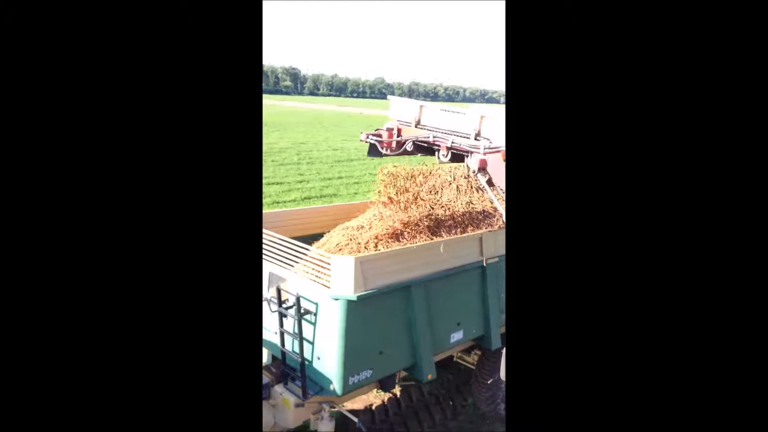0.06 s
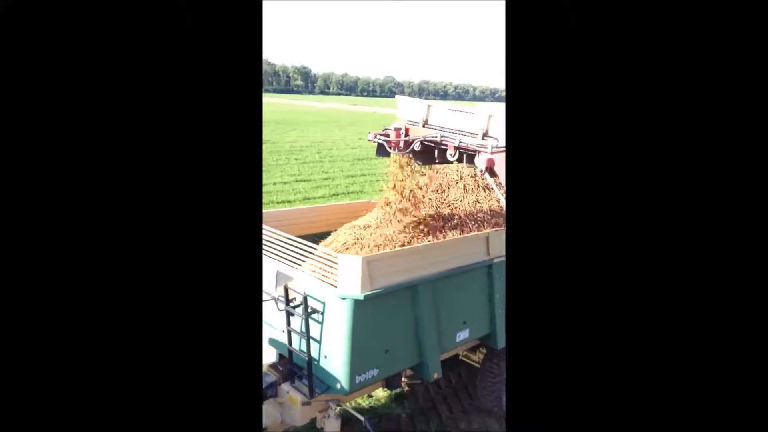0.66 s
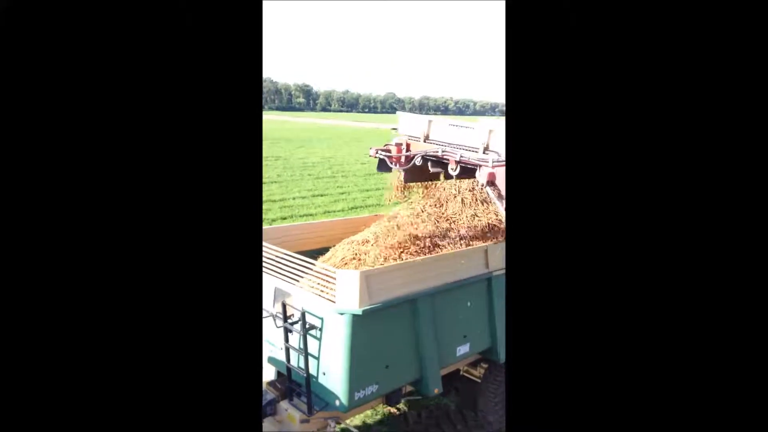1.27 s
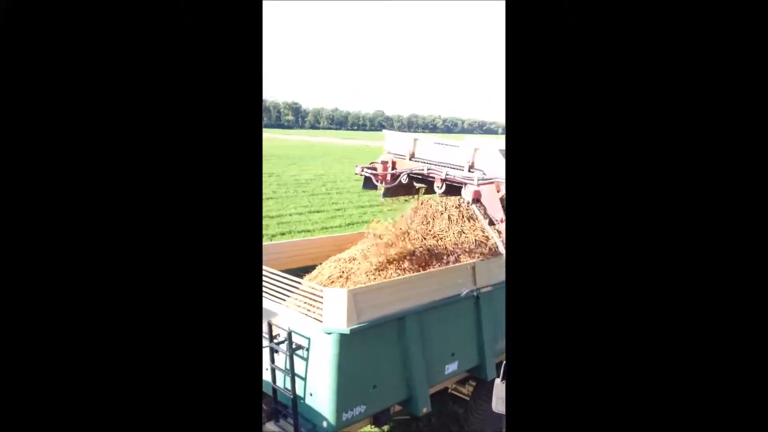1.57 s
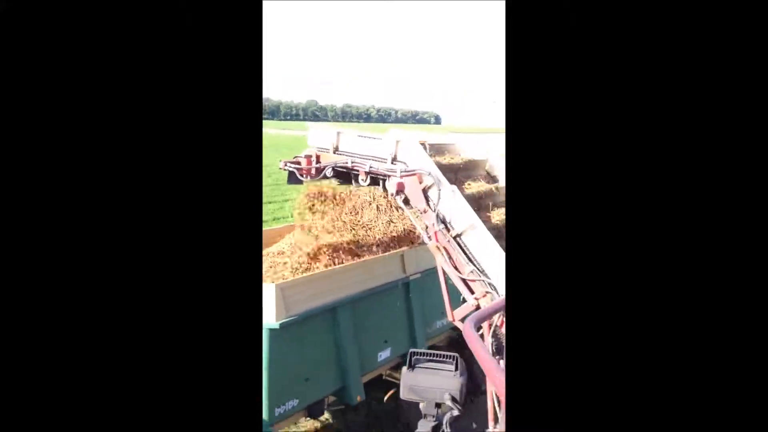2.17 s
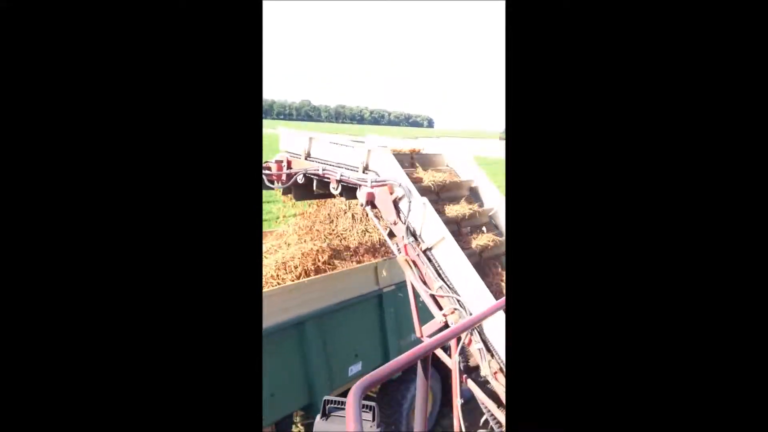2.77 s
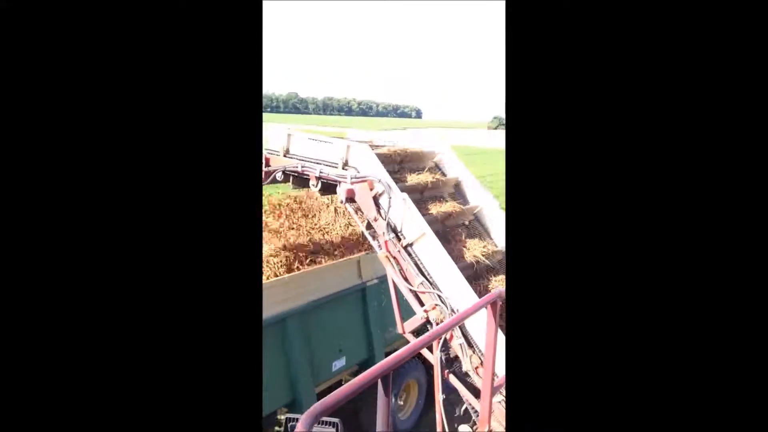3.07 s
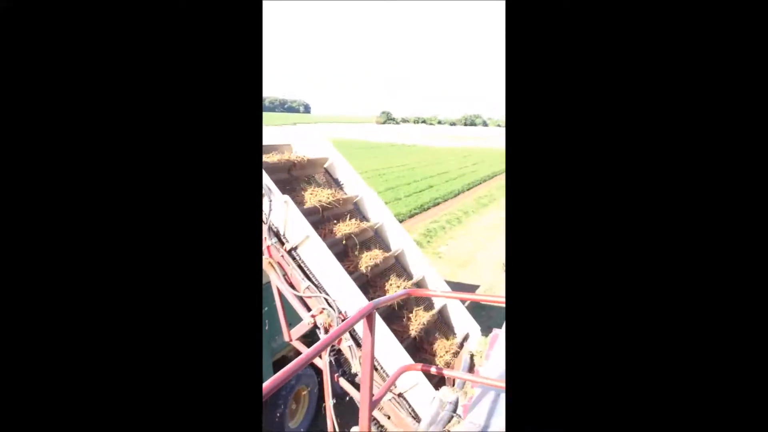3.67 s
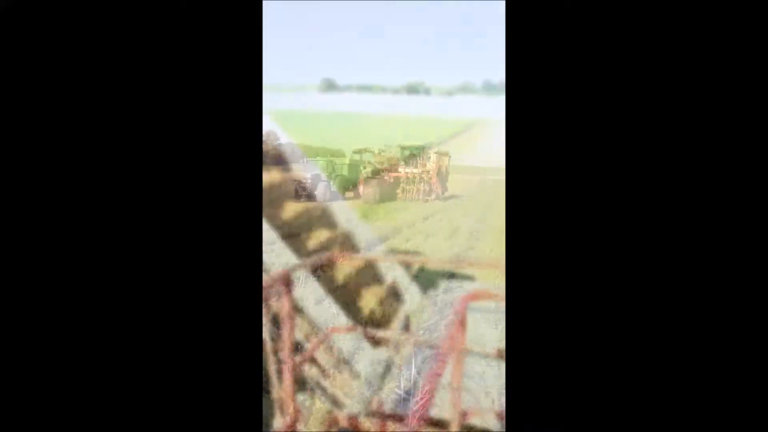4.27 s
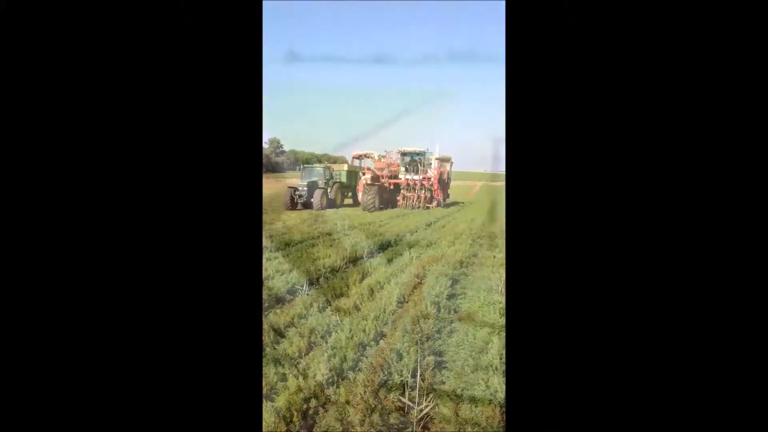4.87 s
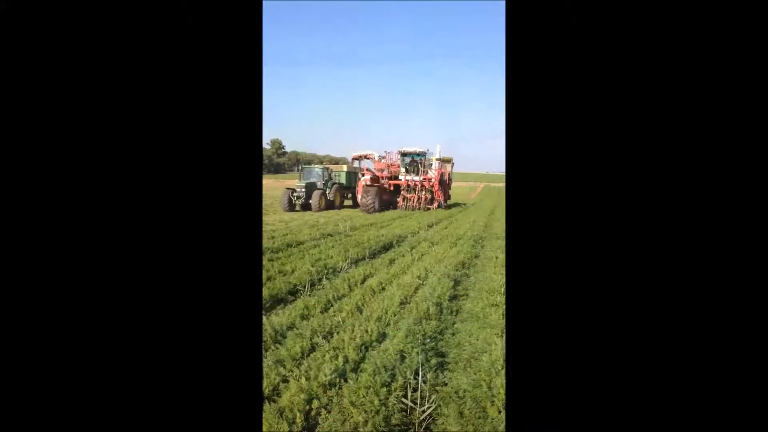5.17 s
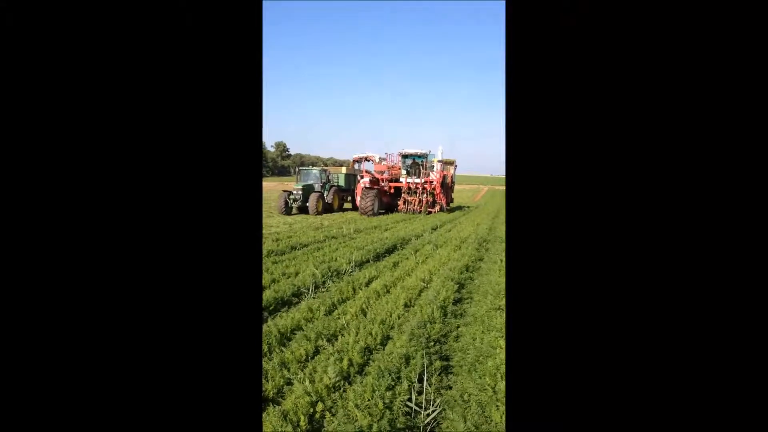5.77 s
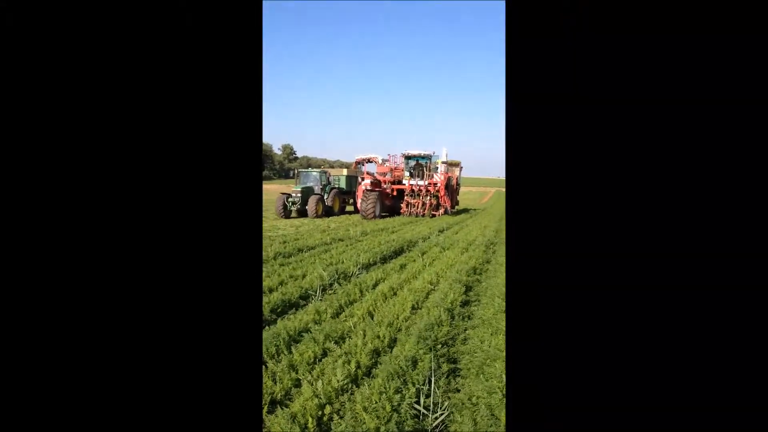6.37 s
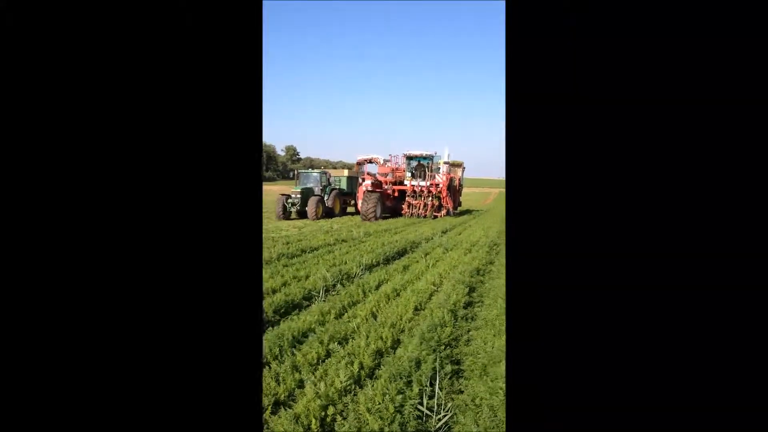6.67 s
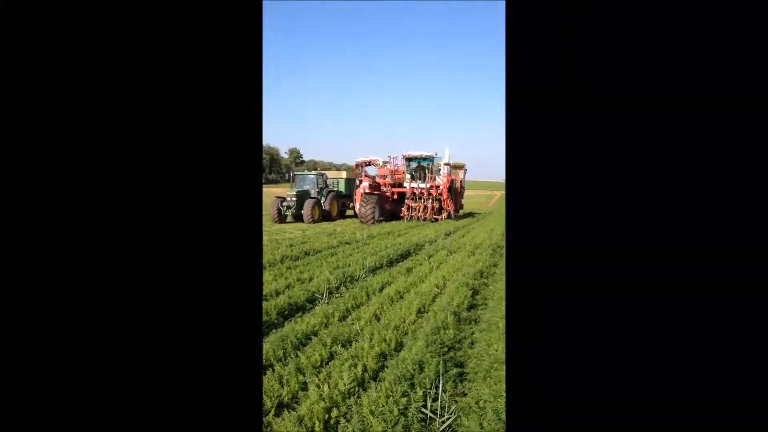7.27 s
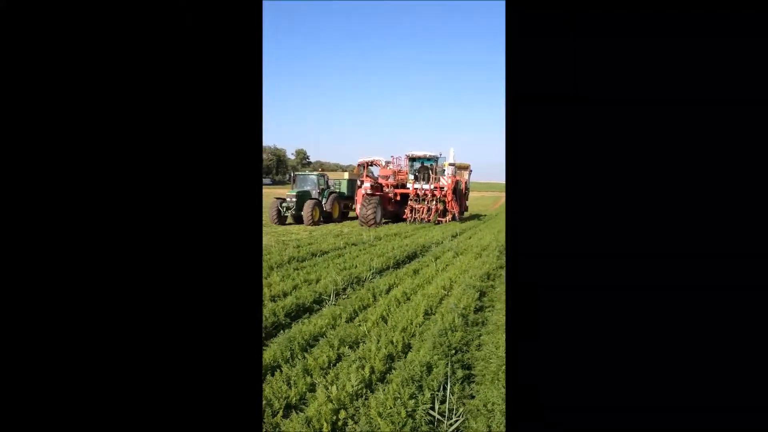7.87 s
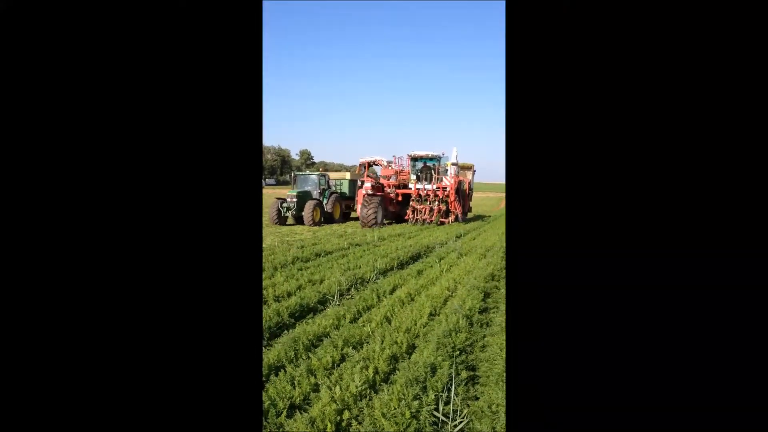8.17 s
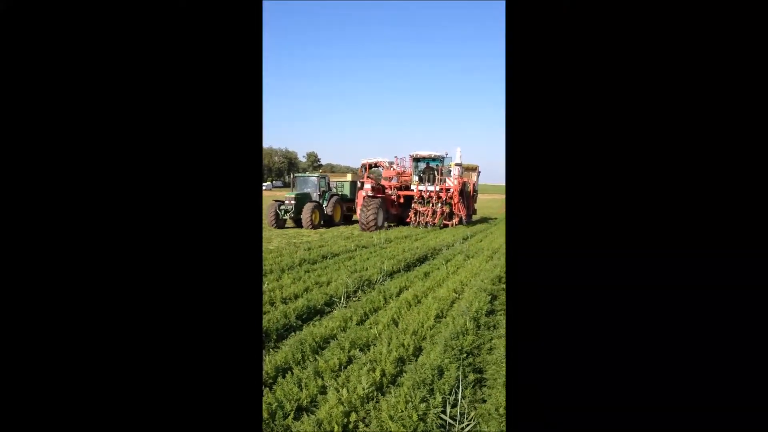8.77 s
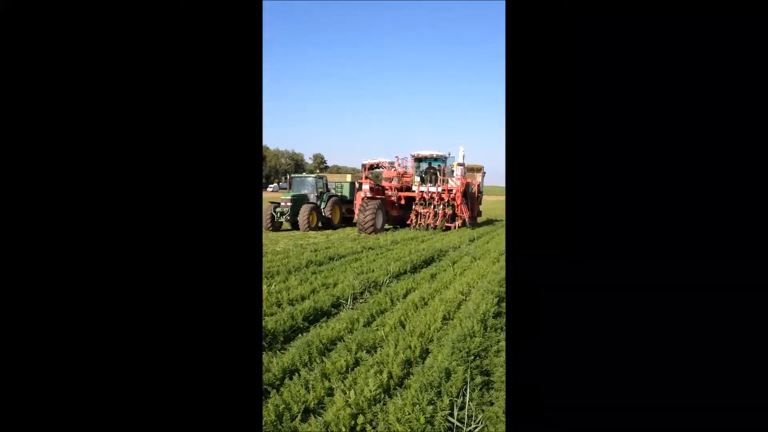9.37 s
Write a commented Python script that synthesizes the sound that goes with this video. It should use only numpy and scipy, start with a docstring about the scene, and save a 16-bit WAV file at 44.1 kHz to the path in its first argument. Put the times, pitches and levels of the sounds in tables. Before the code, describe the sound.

A harvesting machine runs loud and close, its steady diesel hum mixed with conveyor rattle, gear whine and roots knocking as they fall, while gusts bump the microphone. Then a sudden cut leaves a much quieter engine drone heard from a distance in an open field. It creeps nearer with light metallic ringing and a thin bearing squeal, and a low breeze ends in a few thumps.

```python
"""A root-crop harvester's six-cylinder diesel drones, heard from the deck, turning from trailer to elevator.
Fan, belts and sieves roar, a gear whines, chains and falling roots clatter.
Wind buffets hit the microphone and the gain control ducks.
After a cut the same machine creeps closer across the open field, panels ringing and a dry bearing
squealing faintly, in a breeze that ends in a few thumps."""
import sys
import numpy as np
from scipy import signal
from scipy.fft import rfft, irfft, next_fast_len
from scipy.io import wavfile

SR = 44100
rng = np.random.default_rng(int(sys.argv[2]) if len(sys.argv) > 2 else 0)


def unload_wav(signal):
    """Save mono or channel-first audio to the path in sys.argv[1] as 16-bit WAV at rate SR, clipped to [-1, 1]."""
    wavfile.write(
        sys.argv[1],
        SR,
        np.round(np.clip(np.atleast_2d(signal).T, -1, 1) * 32767).astype(np.int16),
    )


N = 424683
T = np.arange(N) / SR
CUT_S = 5.359  # deck to field


def undb(db):
    """Decibels to gain."""
    return np.exp(np.asarray(db) * (np.log(10) / 20))


def curves(table):
    """Table columns interpolated over time."""
    time_s, *columns = np.transpose(table)
    return [np.interp(T, time_s, column) for column in columns]


def swells(table, rise_s=0.25, fall_s=0.41):
    """Boost in dB from swells that rise, hold and fall."""
    return sum(boost_db * np.interp(T - start_s, np.cumsum([0, rise_s, hold_s, fall_s]), [0, 1, 1, 0])
               for start_s, hold_s, boost_db in table)


def walk(rate_hz):
    """Smooth random wander, unit spread."""
    knots = rng.standard_normal(int(N / SR * rate_hz) + 4)
    fine = signal.resample_poly(knots, 8, 1)
    return np.interp(T, np.arange(len(fine)) / (rate_hz * 8), fine)


def colour(x, spectrum):
    """Shape a white signal to (freq_hz, density_db) points."""
    freq_hz, density_db = np.transpose(spectrum)
    size = next_fast_len(N)
    bins_hz = np.maximum(np.fft.rfftfreq(size, 1 / SR), 1)
    gain = undb(np.interp(np.log(bins_hz), np.log(freq_hz), density_db))
    return irfft(rfft(x / x.std(), size) * gain, size)[:N] * np.sqrt(SR / 2)


def butter(x, hz, kind, order=2):
    """Causal Butterworth filter."""
    return signal.sosfilt(signal.butter(order, hz, kind, fs=SR, output="sos"), x)


def zero_phase(x, hz, kind, order, padtype="odd"):
    """Forward-backward Butterworth filter."""
    return signal.sosfiltfilt(signal.butter(order, hz, kind, fs=SR, output="sos"), x, padtype=padtype)


def engine_cycle(in_field, deck_hz, field_hz, hunt_hz, drift_hz):
    """Phase of the six-firing cycle; the governor hunts around the set firing rate."""
    peak_s, period_s = 0.52, 1.0
    hunt = hunt_hz * np.cos(2 * np.pi * (T - peak_s) / period_s)
    firing_hz = np.where(in_field, field_hz + hunt / 2, deck_hz + hunt) + drift_hz * walk(2)
    return 2 * np.pi * np.cumsum(firing_hz) / 6 / SR


# engine, pump and gear tones, with the tractor's engine at orders 13 and 14: cycle_order, trailer_db,
# elevator_db, field_db
ENGINE_ORDERS = [(6, -12.4, -15.6, -42.8), (7, -37, -41, -62), (8, -30, -34, -59), (9, -39, -44, -51),
                 (10, -30, -34, -44), (12, -16.1, -16.7, -40.5), (13, -40, -36, -45), (14, -40, -35, -45),
                 (16, -32, -30, -49), (18, -24.5, -28, -50), (20, -28, -27, -57), (22, -38, -28, -64),
                 (24, -33, -29, -59), (25, -32.5, -31.5, -65), (26, -27.5, -23, -56), (28, -35, -35, -60),
                 (29, -34, -34, -62), (31, -29, -31, -49), (32, -21.5, -23, -42.5), (34, -35, -37, -57),
                 (36, -21.9, -31.5, -44.2), (38, -30.5, -42, -54), (41, -37, -42, -57),
                 (44, -28.5, -36.5, -58), (47, -36, -43, -60), (50, -33.5, -43, -63), (54, -33, -30, -58),
                 (75, -52, -51, -50), (90, -48, -49, -63), (100, -59, -54, -49), (134, -39.3, -45, -52),
                 (162, -49, -50, -68), (180, -43, -46, -63)]
# gear whine swells: start_s, hold_s, boost_db
GEAR_SWELLS = [(.8, 0.84, 6.5), (2.3, 3, 4.5), (6.85, 0.35, 7), (8.6, 0.65, 3.5)]
def engine_tones(cycle, turn, in_field, trailer_trim_db, elevator_trim_db, field_trim_db):
    """Low firing harmonics align in an exhaust pulse; uneven cylinders, pumps and gears add the rest, while
    orders 13 and 14 hum from the tractor's own engine."""
    whine_order, whine_rest_db = 134, -3
    exhaust_db, field_lag_db_per_s = 0.02, 1
    waver = np.where(in_field, 0.44, 0.074 * (1 + turn))
    out = 0
    for order, trailer_db, elevator_db, field_db in ENGINE_ORDERS:
        is_exhaust = order % 6 == 0 and order < 30
        phase = order * cycle + (0 if is_exhaust else rng.uniform(0, 2 * np.pi))
        deck_db = (1 - turn) * (trailer_db + trailer_trim_db) + turn * (elevator_db + elevator_trim_db)
        deck_db += exhaust_db if is_exhaust else -exhaust_db / 2
        lag_db = 0 if is_exhaust else field_lag_db_per_s * (T - CUT_S)
        level_db = np.where(in_field, field_db + field_trim_db - lag_db, deck_db)
        if order == whine_order:
            level_db += whine_rest_db + swells(GEAR_SWELLS)
        # moving air: higher tones waver more and faster
        spread = np.minimum(waver * np.sqrt(order / 32), 0.5)
        waver_hz = 4 + order / 10
        tone = (1 + spread * walk(waver_hz)) * np.cos(phase + spread * walk(waver_hz))
        out += undb(level_db) * tone / np.sqrt((1 + spread ** 2) / 2)
    return out


def clatter(rate_hz, scatter_db, ring_s):
    """Random impacts, each a decaying noise burst of its own size."""
    hits = (rng.random(N) < rate_hz / SR) * undb(scatter_db * np.minimum(rng.exponential(size=N), 4))
    energy = signal.lfilter([1], [1, -np.exp(-2 / (ring_s * SR))], hits ** 2)
    return np.sqrt(energy / energy.mean()) * rng.standard_normal(N)


def rod_clinks(rate_hz, scatter_db, ring_s, low_hz, high_hz):
    """Steel conveyor rods and links, each ringing briefly at its own pitch."""
    t = np.arange(3072) / SR
    decay = np.exp(-t / ring_s)
    out = np.zeros(N + len(t))
    for time_draw, pitch_draw, size_draw in rng.random((int(rate_hz * N / SR), 3)):
        pitch_hz = low_hz * (high_hz / low_hz) ** pitch_draw
        strength = undb(scatter_db * min(-np.log(1 - size_draw), 4))
        start = int(time_draw * N)
        out[start:start + len(t)] += strength * decay * np.sin(2 * np.pi * pitch_hz * t)
    return out[:N] / out.std()


def valve_train(cycle):
    """Injector and valve ticks repeat every engine cycle: a fine comb of weak tones."""
    size = int(SR / 16.3)  # about one cycle
    ticks = rng.standard_normal(size)
    pattern = np.interp(cycle / (2 * np.pi) * size, np.arange(size), ticks, period=size)
    return butter(pattern, [750, 3200], "band", order=3)


# fan, belt and sieve roar, trailer side: freq_hz, density_db
TRAILER_SPECTRUM = [(25, -37), (60, -57), (100, -46), (150, -44.5), (230, -42.5), (350, -46.5),
                    (520, -49.5), (680, -47.5), (900, -53.5), (1300, -56), (2300, -59.5), (2800, -63.5),
                    (3700, -63.5), (4200, -69), (5500, -67.5), (13000, -68.5)]
# same roar, elevator side: freq_hz, density_db
ELEVATOR_SPECTRUM = [(25, -43), (60, -56), (100, -45), (150, -40), (230, -39.5), (400, -40.5), (650, -51),
                     (1100, -51.5), (1600, -56.5), (2300, -58.5), (2900, -65), (3700, -62), (4300, -67),
                     (13000, -65.5)]
def deck_roar(cycle, turn, firing_depth, rattle_db, knock_db, clink_db, valve_db):
    """Close machine noise pulsing with the firings: roots knock, links clink, chains rattle."""
    pulsing = 1 + firing_depth * np.cos(6 * cycle)
    rush = rng.standard_normal(N) * pulsing * undb(0.14 * walk(8.5) - 3.0)
    knocks = butter(clatter(rate_hz=90, scatter_db=2.0, ring_s=0.0032), 1020, "low", order=4)
    clinks = rod_clinks(rate_hz=260, scatter_db=1.5, ring_s=0.015, low_hz=1313, high_hz=4305)
    rattle = butter(clatter(rate_hz=480, scatter_db=6.0, ring_s=0.024), 3600, "high")
    impacts = (undb(knock_db) * knocks + undb(clink_db) * clinks) * pulsing ** 2
    drive = rush + undb(rattle_db) * rattle + impacts + undb(valve_db) * valve_train(cycle)
    return (1 - turn) * colour(drive, TRAILER_SPECTRUM) + turn * colour(drive, ELEVATOR_SPECTRUM)


# tumbling roots: freq_hz, density_db
ROOT_SPECTRUM = [(450, -74), (700, -63.5), (1000, -63.5), (1400, -81), (2700, -76), (5000, -86)]
# swell of the tumbling: start_s, hold_s, boost_db
ROOT_SWELLS = [(2.2, 0.95, 9.5)]
def tumbling_roots(gain_db):
    """Hollow clatter of roots over the conveyor head, swelling as it faces the microphone."""
    tumble = colour(clatter(rate_hz=300, scatter_db=2.5, ring_s=0.0072), ROOT_SPECTRUM)
    return undb(gain_db + swells(ROOT_SWELLS)) * tumble


# wind buffets: centre_s, half_length_s, level_db, harshness (0 dull thump, 1 bright rush)
WIND_BUFFETS = [(2.346, 0.0034, -7.5, 0.45), (2.466, 0.0018, -14, 0.72), (3.621, 0.0031, -2, 0.22),
                (3.671, 0.0079, -4, 0.56), (4.105, 0.0035, -3, .25), (4.125, 0.0043, -2.5, 0.05),
                (4.531, .004, -9.5, 0.74), (4.638, 0.022, -11, 0.4), (5.099, 0.0068, -4.5, 0.55),
                (5.108, 0.0085, -5.5, 0.99), (5.309, 0.0017, -7.5, 0.7), (5.332, 0.004, -10.5, 0.9),
                (6.985, .007, -25, 0), (7.152, .006, -30, 0.089), (8.625, 0.012, -26.5, 0.25),
                (8.765, 0.0033, -17, 0.22), (8.797, 0.0035, -22, 0.19), (8.941, 0.0045, -18.5, 0.096),
                (8.961, 0.0028, -18.5, 0.35), (9.246, 0.003, -22, .1), (9.294, 0.0016, -13, 0.37),
                (9.355, 0.0036, -25, .15), (9.372, 0.0027, -14.5, 0.17), (9.4, 0.0043, -11.5, .25),
                (9.421, 0.0025, -8.5, 0.44), (9.439, 0.0032, -17, 0.37), (9.534, 0.0026, -16.5, 0.24),
                (9.583, .0012, -24, .5)]
# slow pressure pushes of the strongest gusts: centre_s, peak_db
WIND_PUSHES = [(3.672, -1), (4.125, -19), (4.652, 0), (5.122, 0.7)]
def wind_buffets(thump_hz, rush_low_hz, dull_edge_hz, harsh_octaves, snap_s, push_s):
    """Eddies hit the microphone: pressure swing, short rush, suction snap; the strongest also push."""
    out = np.zeros(N)
    for centre_s, half_length_s, level_db, harshness in WIND_BUFFETS:
        near = np.abs(T - centre_s) < 0.08
        t = T[near] - centre_s
        envelope = np.exp(-0.5 * (t / half_length_s) ** 2)
        swing = np.sqrt(2) * envelope * np.sin(2 * np.pi * thump_hz * rng.uniform(0.76, 1.303) * t)
        edge_hz = dull_edge_hz * 2 ** (harsh_octaves * harshness)
        rush = butter(rng.standard_normal(len(t)), edge_hz, "low", order=4)
        rush = butter(rush, rush_low_hz, "high") * envelope
        rush *= np.sqrt(np.sum(envelope ** 2) / np.sum(rush ** 2))
        snap = 2.1 * harshness * np.exp(-np.abs(t + 0.25 / thump_hz) / snap_s)
        out[near] += undb(level_db) * (np.sqrt(1 - harshness) * swing + np.sqrt(harshness) * rush - snap)
    pushes = sum(undb(peak_db) * np.exp(-0.5 * ((T - centre_s) / push_s) ** 2)
                 for centre_s, peak_db in WIND_PUSHES)
    return zero_phase(out, 105, "high", order=4) + pushes


# sieve and panel resonances: pitch_hz, width_hz, level_db
PANEL_MODES = [(1167, 70, -48.5), (1665, 45, -55), (1824, 90, -53.5), (3410, 45, -57), (3610, 110, -54.5),
               (4130, 110, -54.5), (4255, 80, -54.5), (5240, 160, -62), (5880, 260, -57),
               (6500, 220, -59.5)]
def panel_ring(gain_db, shake_db):
    """Shaken sheet metal: narrow resonances that flare and fade independently."""
    shaking = rng.standard_normal(N)
    out = 0
    for pitch_hz, width_hz, level_db in PANEL_MODES:
        ring = butter(shaking, [pitch_hz - width_hz / 2, pitch_hz + width_hz / 2], "band")
        out += undb(gain_db + level_db + shake_db * walk(12)) * ring / ring.std()
    return out


# machine roar across the field: freq_hz, density_db
FIELD_SPECTRUM = [(60, -88), (120, -61), (230, -57), (400, -69), (720, -63.5), (910, -70.5), (1020, -68),
                  (1200, -70), (1400, -71.5), (1750, -73.5), (2200, -75), (2600, -82), (3550, -80),
                  (4250, -78), (4550, -86), (5900, -83.5), (6600, -82), (7300, -87.5), (8000, -84),
                  (8800, -88), (9600, -93.5), (10400, -92), (11700, -92.5), (14000, -95)]
def field_roar(cycle, echo_gain, rattle_db, valve_db, body_waver_db, hiss_waver_db, hiss_lag_db_per_s):
    """Distant machine noise, combed by one short, dull echo; moving air wavers body and hiss apart."""
    drive = rng.standard_normal(N) + undb(rattle_db) * clatter(rate_hz=120, scatter_db=2.5, ring_s=0.0095)
    drive += undb(valve_db) * valve_train(cycle)
    comb_hz = 585
    echo = zero_phase(np.roll(drive, int(SR / comb_hz)), 6800, "low", order=3)
    roar = colour(drive + echo_gain * echo, FIELD_SPECTRUM)
    body = zero_phase(roar, 4470, "low", order=4)
    hiss = roar - body
    body_db = body_waver_db * walk(5)
    hiss_db = hiss_waver_db * walk(9) - hiss_lag_db_per_s * (T - CUT_S)
    return body * undb(body_db) + hiss * undb(hiss_db)


# bearing squeal: time_s, pitch_hz, boost_db
BEARING_TRACK = [(5.4, 9950, 4), (5.9, 9975, 5), (6.12, 9960, 9), (6.28, 9920, 4), (6.6, 9945, 8),
                 (7.1, 9970, 7), (7.33, 9940, 3), (7.55, 10000, 11), (7.74, 9900, 4), (8.0, 9910, 11),
                 (8.15, 9915, 7), (8.32, 9925, 12), (8.52, 9975, 1), (8.8, 9975, 8), (9.6, 9948, 8)]
def bearing_squeal(rest_db, fringe_hz, sway_hz, core_gain, flicker_db):
    """Dry bearing: a thin high core that slides and flickers, with an unsteady fringe."""
    pitch_hz, boost_db = curves(BEARING_TRACK)
    phase = 2 * np.pi * np.cumsum(pitch_hz + sway_hz * walk(14)) / SR
    tone = (core_gain + walk(fringe_hz)) * np.cos(phase) + walk(fringe_hz) * np.sin(phase)
    return undb(rest_db + boost_db + flicker_db * walk(16)) * tone / np.hypot(1, core_gain)


# breeze rustle: freq_hz, density_db
RUSTLE_SPECTRUM = [(30, -77), (70, -74), (120, -73), (210, -56.5), (300, -59.5), (500, -73.5), (2000, -100)]
# breeze swells: start_s, hold_s, boost_db
RUSTLE_SWELLS = [(6.45, .3, 1.5), (9.15, .25, 5.5)]
def breeze(rest_db, flutter_db):
    """Light field wind: a low rustle of small, uneven eddies."""
    eddies = clatter(rate_hz=110, scatter_db=1.2, ring_s=0.016)
    return undb(rest_db + swells(RUSTLE_SWELLS) + flutter_db * walk(15)) * colour(eddies, RUSTLE_SPECTRUM)


# listener's turn on deck: time_s, turn (0 trailer, 1 elevator), level_db
DECK_TURN = [(0, 0, -2.5), (2.1, 0.09, -2), (2.7, 0.23, -2.5), (3.4, 0.7, -1.5), (4.4, 0.91, 1.2),
             (5.35, 0.93, -0.4)]
def scene():
    """Deck, then field; one engine drives both."""
    in_field = T >= CUT_S
    turn, deck_db = curves(DECK_TURN)
    cycle = engine_cycle(in_field, deck_hz=97.88, field_hz=98.32, hunt_hz=0.17, drift_hz=0.07)
    engine = engine_tones(cycle, turn, in_field, trailer_trim_db=1.56, elevator_trim_db=3,
                          field_trim_db=1.5)
    roots = tumbling_roots(gain_db=0.5)
    near_roar = deck_roar(cycle, turn, firing_depth=0.071, rattle_db=-7, knock_db=-4, clink_db=-14.5,
                          valve_db=-7.5)
    deck = undb(deck_db) * (engine + roots + near_roar)
    panels = panel_ring(gain_db=-3, shake_db=2.5)
    far_roar = field_roar(cycle, echo_gain=0.23, rattle_db=-5.5, valve_db=-6, body_waver_db=0.2,
                          hiss_waver_db=1.2, hiss_lag_db_per_s=0.8)
    approach_db = -0.83 + 1.04 * (T - CUT_S)
    field = undb(approach_db) * (engine + panels + far_roar)
    field += bearing_squeal(rest_db=-71, fringe_hz=60, sway_hz=14.4, core_gain=2.2, flicker_db=2.5)
    field += breeze(rest_db=-1.5, flutter_db=1)
    wind = wind_buffets(thump_hz=198, rush_low_hz=231, dull_edge_hz=332, harsh_octaves=2.67,
                        snap_s=0.00062, push_s=0.01)
    return (np.where(in_field, field, deck) + wind)[None]


def gain_control(x, threshold_db, release_db_per_s):
    """Ducks at once when short-term level passes the threshold, then recovers steadily."""
    power = signal.lfilter([1 / 600], [1, 1 / 600 - 1], x ** 2)
    over_db = np.maximum(10 * np.log10(power + 1e-12) - threshold_db, 0)
    climb_db = release_db_per_s * np.arange(len(x)) / SR
    return x * undb(climb_db - np.maximum.accumulate(over_db + climb_db))


def record(dry):
    """Gain control per scene, then wind filter, soft clip and treble cut-off."""
    parts = np.split(dry[0], [int(CUT_S * SR)])
    x = np.concatenate([gain_control(part, threshold_db=-8, release_db_per_s=13.5) for part in parts])
    x = zero_phase(x, 54, "high", order=2, padtype="even")
    x = x / (1 + x ** 8) ** (1 / 8)
    x = butter(x, 14100, "low", order=8)
    return signal.sosfilt(signal.ellip(10, 0.2, 80, 15400, fs=SR, output="sos"), x)[None]


dry = scene()
out = record(dry)
unload_wav(out)
```